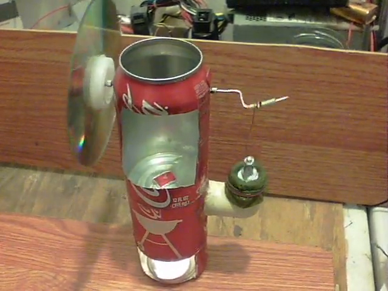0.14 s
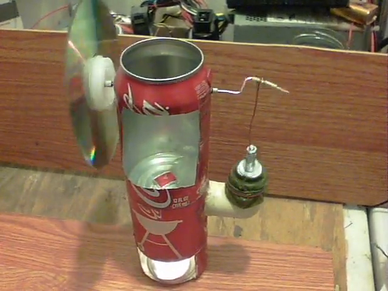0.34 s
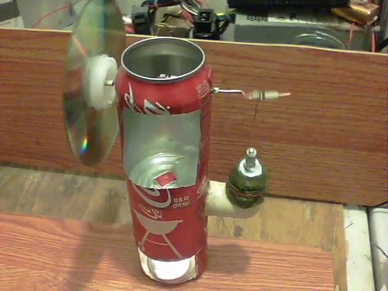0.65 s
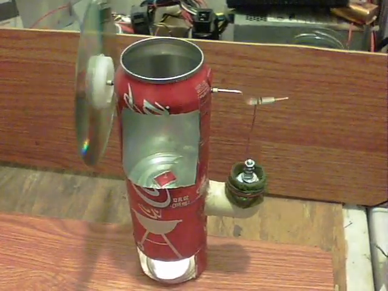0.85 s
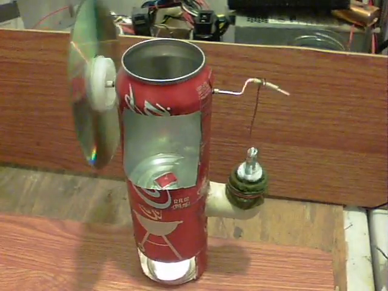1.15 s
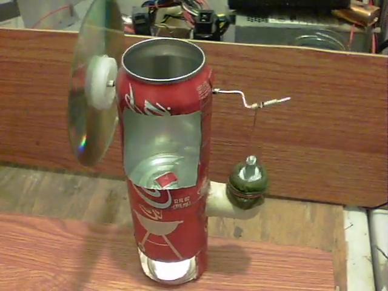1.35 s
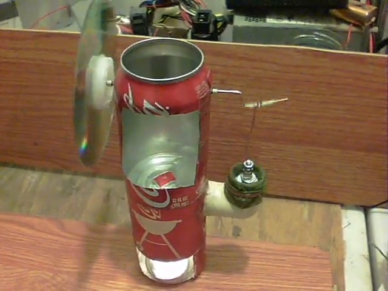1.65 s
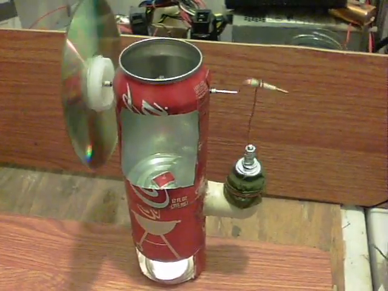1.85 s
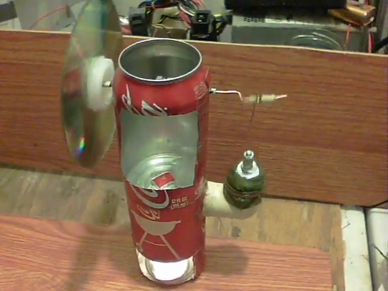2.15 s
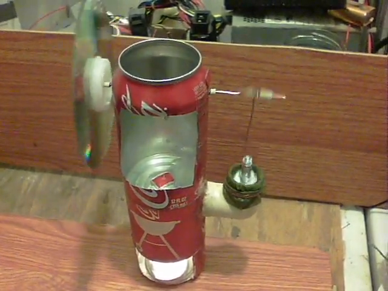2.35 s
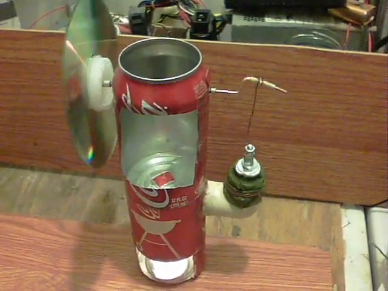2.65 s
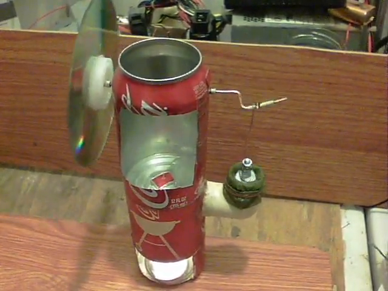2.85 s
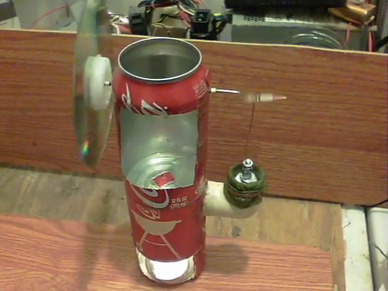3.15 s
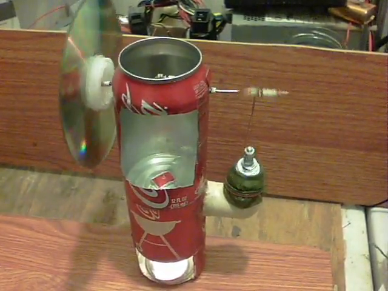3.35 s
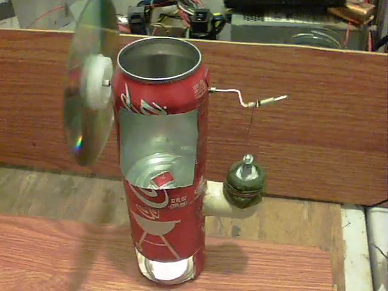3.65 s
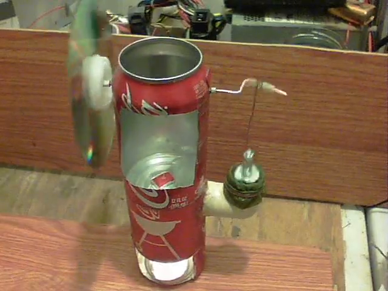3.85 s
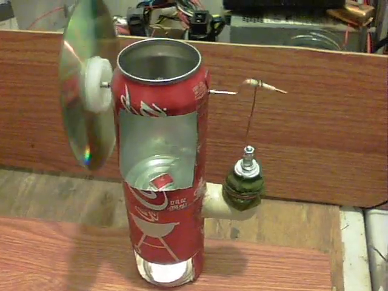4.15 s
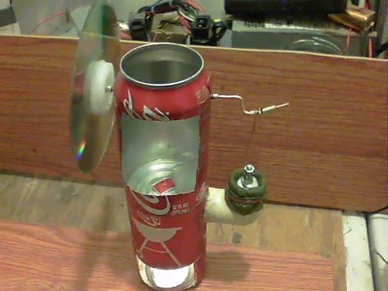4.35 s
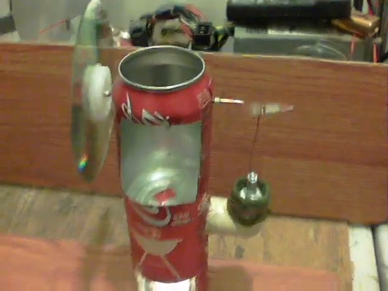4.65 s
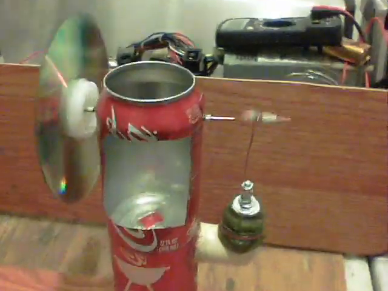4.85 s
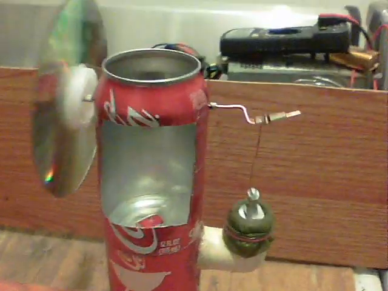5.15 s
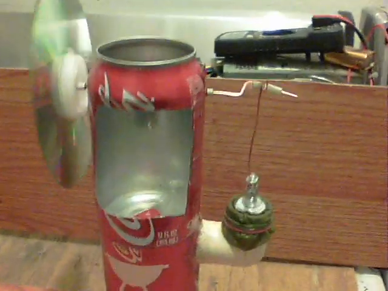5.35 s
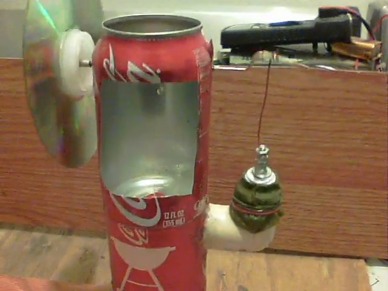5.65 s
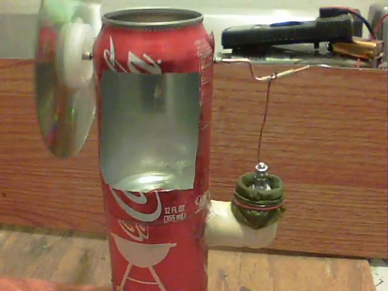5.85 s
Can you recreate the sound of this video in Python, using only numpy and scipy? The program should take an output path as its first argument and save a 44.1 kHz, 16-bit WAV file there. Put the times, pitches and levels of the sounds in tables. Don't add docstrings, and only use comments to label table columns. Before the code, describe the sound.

Close-up tinny mechanical clatter, going from start to end without stopping. Loud crank snaps alternate with tight clusters of wire knocks, small ticks and light scraping, slightly uneven from turn to turn. Everything has a short hollow can ring and a little low table thump. Short room reflections, soft hum, rumble and hiss; a cheap microphone with dulled treble.

```python
import sys
import numpy as np
from scipy import signal
from scipy.fft import rfft, irfft
from scipy.io import wavfile
from scipy.ndimage import uniform_filter1d

SR = 44100
rng = np.random.default_rng(int(sys.argv[2]) if len(sys.argv) > 2 else 0)


def invert_db(level):
    return 10 ** (np.asarray(level, dtype=float) / 20)


def master_out(mix):
    frames = np.transpose(np.atleast_2d(mix))
    ceiling = np.clip(frames, -1, 1)
    pcm = np.round(ceiling * 32767).astype(np.int16)
    wavfile.write(sys.argv[1], SR, pcm)


N = 264159
BLOW_N = 2400

# start_s [s], peak_db [dB], low_modes_db [dB], high_modes_db [dB]
CLACK_TIMES = [(0.28, -10, -8, -3.5), (0.697, -9, -2.5, -3), (1.102, -9.5, -0.5, -1),
               (1.483, -9, -1.5, -0.5), (1.853, -9.5, -3, 0.5), (2.236, -13, 0, 4), (2.627, -9, -3.5, -1),
               (3.019, -10, -4.5, 0.5), (3.405, -10.5, -1.5, 0.5), (3.782, -9, -3.5, 1),
               (4.146, -8.5, -4.5, 1), (4.516, -8, -1.5, -2), (4.892, -8, -6.5, -3.5),
               (5.275, -7.5, -2.5, 2), (5.657, -7.5, -1.5, 0.5)]
CAN_PITCHES = [615, 740, 850, 910, 1140, 1258, 1405, 1575, 1785, 1890, 2010, 2110, 2212, 2375, 2518, 2870,
               2966, 3180, 3331, 3423, 3670, 4050, 4350, 4740, 4960, 5270, 5790]
# level_db [dB], fall_by_60_db_s [s]
CAN_FADES = [(-5, 0.065), (-7.5, 0.041), (-4.5, 0.084), (-3, 0.058), (-1, 0.045), (-5.5, 0.088),
             (-3, 0.036), (-4, 0.073), (-6.5, 0.059), (-5.5, 0.069), (-8.5, 0.066), (5, 0.025),
             (3.5, 0.034), (-5, 0.05), (-3, 0.037), (-5.5, 0.084), (-7, 0.046), (-17.5, .07), (-0.5, 0.044),
             (-10, 0.068), (-2, 0.026), (-14, 0.083), (-10, 0.031), (-6.5, 0.034), (-17.5, 0.041),
             (-5.5, 0.022), (-15.5, 0.044)]
# pitch_hz [Hz], level_db [dB], fall_by_60_db_s [s]
WIRE_SNAP = [(629, -8, 0.011), (923, 3.5, 0.018), (1290, -12, 0.021), (1797, -8.5, 0.01), (2140, -6, 0.02),
             (2410, -6, 0.009), (2894, -1.5, 0.0078), (3555, -4.5, 0.01), (4120, -6.5, 0.01),
             (4980, -5, 0.0098), (5965, -19, 0.017)]
# touch_s [s], knock_s [s]
SWING_TIMES = [(0, .0153), (.4081, .4211), (.8184, .8287), (1.2365, 1.2426), (1.6045, 1.6205),
               (1.9761, 1.9885), (2.364, 2.3797), (2.7454, 2.7592), (3.1367, 3.1506), (3.5247, 3.5399),
               (3.8931, 3.9062), (4.2636, 4.2789), (4.632, 4.6434), (5.0101, 5.0238), (5.3958, 5.4089),
               (5.7823, 5.7954)]
# touch_db [dB], knock_db [dB]
SWING_LEVELS = [(-23, -14), (-16.5, -14.5), (-23.5, -14.5), (-22.5, -20), (-26, -16), (-19.5, -13),
                (-26, -12.5), (-24, -12.5), (-21, -12.5), (-20.5, -18.5), (-26.5, -15.5), (-17.5, -11.5),
                (-17.5, -17.5), (-17.5, -12.5), (-15, -11), (-16.5, -11.5)]
# first_s [s], second_s [s], third_s [s]
BEAT_TIMES = [(.0429, .0533, .0606), (.4583, .4704, .4808), (.8678, .8769, .8905), (1.2664, 1.2796, 1.2958),
              (1.6471, 1.6576, 1.6726), (2.0173, 2.0272, 2.0477), (2.408, 2.4168, 2.4335),
              (2.7874, 2.7992, 2.8176), (3.18, 3.195, 3.2095), (3.5674, 3.5824, 3.5981),
              (3.9393, 3.9455, 3.9601), (4.3088, 4.3188, 4.3296), (4.679, 4.6899, 4.7042),
              (5.0585, 5.0673, 5.0793), (5.4393, 5.452, 5.4655), (5.8303, 5.8532, 5.8647)]
# first_db [dB], second_db [dB], third_db [dB], low_modes_db [dB], high_modes_db [dB]
BEAT_LEVELS = [(-14, -14, -14, -13, -4), (-18.5, -15, -15.5, -2.5, -0.5), (-26, -12, -13.5, -16.5, -1),
               (-15, -6, -9, -6, 2), (-16.5, -9, -18, -4, 3), (-12.5, -8, -11.5, -15, -1),
               (-10, -13, -12, -13.5, .5), (-15.5, -11, -14, -14.5, -11), (-14, -9.5, -13.5, -12.5, 2),
               (-13, -16.5, -11.5, -11, 3), (-12.5, -13.5, -13.5, -6.5, 0), (-13, -13, -10, -15, -6),
               (-14.5, -15.5, -19, -12, .5), (-12, -19.5, -10.5, 0, 1), (-16, -7.5, -9.5, -11.5, 1.5),
               (-7, -9.5, -19.5, -10, -1)]


def evened(x):
    return x / np.sqrt(np.mean(x ** 2) + 1e-20)


def ring(modes, low_db, high_db, spread_db, rise):
    hz, db, t60 = np.transpose(modes)[:, :, None]
    t = np.arange(BLOW_N) / SR
    luck = rng.standard_normal((len(modes), 3))
    tilt_db = np.interp(hz, [1300, 1700, 2600, 3100], [low_db, 0, 0, high_db])
    level_db = db + tilt_db + spread_db * luck[:, :1] - 60 * t / t60
    gain = np.exp(np.float32(level_db * np.log(10) / 20))
    pitch_hz = hz + 0.57 / t60 * luck[:, 1:2]
    waves = gain * np.sin(np.float32(2 * np.pi * pitch_hz * t + 2 * luck[:, 2:]))
    fade_out = np.minimum(4 * (1 - t / t[-1]), 1)
    return waves.sum(0) * (1 - np.exp(-t / rise)) * fade_out


def ring_can(low_db, high_db, spread_db, rise):
    return ring(np.c_[CAN_PITCHES, CAN_FADES], low_db, high_db, spread_db, rise)


def blows(table, snap, db, can_db, spread_db, can_rise, snap_rise, crack_db=-60):
    out = np.zeros(N + BLOW_N)
    t = np.arange(BLOW_N) / SR
    for s, peak_db, low_db, high_db in table:
        crack = np.diff(rng.standard_normal(BLOW_N + 1))
        crack *= invert_db(crack_db + high_db - 60 * t / .012) * (1 - np.exp(-t / .001))
        sound = crack + ring(snap, low_db, high_db, spread_db, snap_rise)
        sound += invert_db(can_db) * ring_can(low_db, high_db, 4.2, can_rise)
        at = round(max(s, 0) * SR)
        out[at:at + BLOW_N] += invert_db(peak_db + db) * sound / abs(sound).max()
    return out[:N]


def contacts(s, peak_db, tilt):
    luck_db = 3 * rng.standard_normal((len(s), 2))
    return np.c_[s, peak_db, np.add(tilt, luck_db)]


def clack():
    # pitch_hz [Hz], level_db [dB], fall_by_60_db_s [s]
    pin_snap = [(898, 1.5, 0.013), (1269, -4.5, 0.055), (2350, -6.5, 0.016), (3562, 4, 0.016),
                (4954, -3, 0.019), (6060, -12.5, 0.018)]
    # pitch_hz [Hz], level_db [dB], fall_by_60_db_s [s]
    rod_thud = [(700, 2.5, 0.015), (879, -3, 0.11)]
    # pitch_hz [Hz], level_db [dB], fall_by_60_db_s [s]
    wall_rebound = [(1292, -2.5, 0.016), (1918, -4.5, 0.015), (2130, -1, 0.0047), (2302, 6, 0.013),
                    (2838, 0.5, 0.01)]

    def shifted(s):
        return np.add(CLACK_TIMES, [s, 0, 0, 0])

    out = blows(CLACK_TIMES, pin_snap, db=-3.5, can_db=-11.5, spread_db=4.0,
                can_rise=0.0013, snap_rise=0.00027, crack_db=-12.5)
    out += blows(shifted(-.0052), rod_thud, db=-18.5, can_db=-19.5, spread_db=-2.5,
                 can_rise=0.0039, snap_rise=0.001)
    out += blows(shifted(.0045), wall_rebound, db=-9.5, can_db=-8.0, spread_db=2.0,
                 can_rise=0.0011, snap_rise=0.0016)
    out += blows(shifted(0.011), wall_rebound, db=-10.5, can_db=-7.0, spread_db=4.0,
                 can_rise=0.001, snap_rise=0.00054)
    return out


def rattle_blows():
    knock_tilt, bounce_tilt = (-1.9, -4.5), (3.3, -1.9)
    graze_s, graze_db = .003, -6
    settle_s, settle_db = 0.022, -1.5
    lull_db = -0.5
    knock, knock_db = np.transpose(SWING_TIMES)[1], np.transpose(SWING_LEVELS)[1]
    first, second, third = np.transpose(BEAT_TIMES)
    beat_db, tilt = np.array(BEAT_LEVELS)[:, :3].T, np.array(BEAT_LEVELS)[:, 3:]

    rows = [contacts(knock, knock_db, knock_tilt)]
    for s, db in zip([first, second, third], beat_db):
        rows.append(contacts(s, db, tilt))
    rows.append(contacts(knock - graze_s, knock_db + graze_db, knock_tilt))
    rows.append(contacts(first - graze_s, beat_db[0] + graze_db, tilt))

    end = third + settle_s
    middle = (third + end) / 2
    gaps = [(knock, first, lull_db), (first, second, 0), (second, third, 0),
            (third, middle, settle_db / 2), (middle, end, settle_db)]
    for a, b, fade_db in gaps:
        place = rng.uniform(.3, .8, len(a))
        bounce_db = -11.5 + 2 * rng.standard_normal(len(a))
        rows.append(contacts(a + (b - a) * place, beat_db.mean(0) + bounce_db + fade_db, bounce_tilt))
    return np.vstack(rows)


def rattle():
    return blows(rattle_blows(), WIRE_SNAP, db=0.5, can_db=-11.0, spread_db=3.5,
                 can_rise=0.00074, snap_rise=0.00063, crack_db=-19.0)


def table_thump(rattling):
    return signal.lfilter(*signal.butter(2, [210, 450], "band", fs=SR), abs(rattling))


def tick_blows():
    # start_s [s], peak_db [dB], high_modes_db [dB], drag_db [dB]
    reversals = [(0.2005, -19.5, -1.5, -40), (.611, -22.5, -2, -37), (1.0186, -17.5, 0, -31),
                 (1.4153, -18.5, -3.5, -28), (1.752, -21, -1.5, -41), (2.1695, -16, -4, -29),
                 (2.5579, -20, 0.5, -39), (2.9401, -13.5, 0.7, -28), (3.33, -19.5, -7, -31),
                 (3.7101, -14, -2, -28), (4.076, -19.5, -13, -23.5), (4.4487, -17.5, 0.5, -30),
                 (4.8215, -15.5, 2, -26), (5.2023, -11, 2.5, -27), (5.5869, -19, -14, -26.5),
                 (5.9779, -14.5, -3, -28)]
    # start_s [s], peak_db [dB], low_modes_db [dB], high_modes_db [dB]
    stray_catches = [
        (.6304, -26, 13, 0),
        (2.1344, -22.5, 2, -4),
        (2.524, -31, 7, -2.5),
        (4.0453, -20.5, 6.5, -1.5),
        (4.415, -24, 0, -7),
        (0.2, -25.5, 11, -5),
        (1.7985, -28, 9, -6),
        (0.5, -29, -2, 6),
    ]
    s, db, high_db, drag_db = np.transpose(reversals)
    one = np.ones(len(s))
    tick = np.c_[s, db, 8 * one, high_db]
    drag = np.c_[s - .0155, drag_db, np.outer(one, (-10, -1.5))]
    bounce = np.c_[np.minimum(s + 0.012, N / SR), db - 14.5, np.outer(one, (1.5, -15.5))]
    return np.vstack([tick, drag, bounce, stray_catches])


def ticks():
    # pitch_hz [Hz], level_db [dB], fall_by_60_db_s [s]
    rod_snap = [(896, -10, 0.012), (1182, 1.5, 0.021), (1449, -7.5, 0.06), (1618, -2.5, 0.051),
                (2440, -5.5, 0.013), (3004, 7, 0.0099), (4366, 7.5, 0.0092), (5700, 1, 0.0038)]
    return blows(tick_blows(), rod_snap, db=-1.5, can_db=-11.0, spread_db=2.5,
                 can_rise=0.0083, snap_rise=0.00026, crack_db=-3.5)


def touches():
    # pitch_hz [Hz], level_db [dB], fall_by_60_db_s [s]
    light_snap = [(1240, -9.5, .015), (2170, -5, .015), (2950, -5, 0.025), (3530, 0.5, 0.021),
                  (5000, -2, 0.0055), (5800, -9, 0.0074)]
    table = contacts(np.transpose(SWING_TIMES)[0], np.transpose(SWING_LEVELS)[0], (-1.5, .5))
    return blows(table, light_snap, db=0.5, can_db=-14.0, spread_db=2.0,
                 can_rise=.0015, snap_rise=0.00057, crack_db=-9.5)


def flicks():
    # start_s [s], peak_db [dB]
    rim_flicks = [(.0266, -16), (.4345, -17), (.8426, -19), (1.2491, -26), (1.6324, -19), (2.003, -19),
                  (2.3937, -16), (2.773, -28), (3.1616, -22), (3.5526, -38), (4.294, -28), (4.6578, -23),
                  (5.0365, -28), (5.423, -23), (5.8127, -8.5)]
    # pitch_hz [Hz], level_db [dB], fall_by_60_db_s [s]
    rim_snap = [(2900, -4.5, .005), (3600, 7.5, 0.0062), (4500, 0, 0.0088), (5460, -10, 0.0035)]
    edges = np.c_[np.ravel(BEAT_TIMES) + .0015, np.array(BEAT_LEVELS)[:, :3].ravel() - 6]
    table = [(s, db, -6., 0) for s, db in np.r_[rim_flicks, edges]]
    return blows(table, rim_snap, db=-1.5, can_db=-24.0, spread_db=3.0,
                 can_rise=.0008, snap_rise=.0001, crack_db=-13.0)


def crank_turn():
    s = np.array(CLACK_TIMES)[:, 0]
    s = np.r_[2 * s[0] - s[1], s, 2 * s[-1] - s[-2]]
    return np.interp(np.arange(N) / SR, s, np.arange(len(s))) % 1


def chatter():
    # share_of_turn [0 to 1 after the clack], level_db [dB]
    turn_levels = [(0, -42.5), (0.04, -42), (0.119, -47.5), (.26, -48.5), (0.326, -37), (.37, -32.5),
                   (.43, -33), (.5, -26), (.56, -43), (0.639, -48), (0.719, -51.5), (0.781, -43),
                   (.86, -50), (0.952, -66), (0.999, -49)]
    hits = rng.random(N) < 700 / SR
    size = invert_db(4.1 * np.minimum(rng.exponential(1, N), 4)) * hits
    size = evened(size) * invert_db(np.interp(crank_turn(), *np.transpose(turn_levels)))
    spot = rng.integers(0, 8, N)
    out = np.zeros(N)
    for k in range(8):
        shape = ring_can(-1.3, -1.5, 4.7, 0.00024)
        shape = shape + invert_db(7.5) * ring(WIRE_SNAP, -9.5, 2.4, 8.5, 0.00013)
        out += signal.oaconvolve(size * (spot == k), shape / np.linalg.norm(shape))[:N]
    return out


def slide():
    # share_of_turn [0 to 1 after the clack], level_db [dB]
    slide_levels = [(0, -59.5), (.2, -45.5), (0.498, -56.5), (.7, -53), (.92, -66), (0.997, -57.5)]
    band = signal.butter(5, [3300, 5250], "band", fs=SR, output="sos")
    hiss = evened(signal.sosfilt(band, rng.standard_normal(N)))
    grip = evened(uniform_filter1d(rng.standard_normal(N), 250))
    return hiss * invert_db(np.interp(crank_turn(), *np.transpose(slide_levels)) + 3.1 * grip)


def table_and_room(x):
    taps = np.zeros(9000)
    at = np.arange(100, 8980, 20) + rng.integers(0, 20, 444)
    taps[at] = rng.choice([-1., 1.], 444) * invert_db(-60 * at / SR / 0.13)
    return signal.oaconvolve(x, taps / np.linalg.norm(taps))[:N]


def coloured(points):
    hz, db = np.transpose(points)
    bins = np.fft.rfftfreq(N, 1 / SR)
    gain = invert_db(np.interp(np.log(bins + 1), np.log(hz + 1), db))
    return evened(irfft(rfft(rng.standard_normal(N)) * gain, N))


def steady_tones(table):
    t = np.arange(N) / SR
    return sum(invert_db(db) * np.sqrt(2) * np.sin(2 * np.pi * hz * t) for hz, db in table)


def background():
    # pitch_hz [Hz], level_db [dB per Hz]
    room_colour = [(8.8, -25), (15, 14), (44, 5), (97, 2.5), (542, -5), (860, -17.5), (1000, -11.5),
                   (2340, -14.5), (2650, -14), (3520, -15.5), (4910, -16), (6180, -38.5), (6850, -64),
                   (8900, -83), (15100, -120)]
    # pitch_hz [Hz], level_db [dB]
    hum_tones = [
        (120, -54.5),
        (246, -60),
    ]
    lumps = coloured([(8, -26.5), (18, 5), (45, -1.5), (65, -9.5), (90, -33.5), (200, -55.5), (20000, -120)])
    sway = evened(uniform_filter1d(rng.standard_normal(N), 4900))
    rumble = lumps * invert_db(-40.5 + 2.5 * sway)
    drift = evened(uniform_filter1d(rng.standard_normal(N), 3000))
    room = invert_db(-42.0 + 1.8 * drift) * coloured(room_colour)
    return room + rumble + steady_tones(hum_tones)


def air():
    band = signal.butter(3, (5530, 6440), "band", fs=SR, output="sos")
    return invert_db(-70) * evened(signal.sosfilt(band, rng.standard_normal(N)))


def scene():
    rattling = rattle()
    engine = clack() + rattling + invert_db(-3.5) * table_thump(rattling)
    engine = engine + ticks() + touches() + flicks() + chatter() + slide()
    heard = engine + invert_db(-12.0) * table_and_room(engine)
    mic_edge = signal.butter(8, 6300, fs=SR, output="sos")
    return (signal.sosfilt(mic_edge, heard) + background() + air())[None]


def top_cut(x):
    return signal.sosfilt(signal.butter(12, 12500, fs=SR, output="sos"), x)


def record(dry):
    # pitch_hz [Hz], level_db [dB]
    whine_tones = [(8269, -105), (9647, -107), (11025, -91.5), (12403, -106)]
    overloaded = 0.63 * np.tanh(dry / 0.62)
    low_pass = signal.firwin(241, 6950, window=("kaiser", 7.5), fs=SR)
    limited = signal.oaconvolve(overloaded, low_pass[None], "same")
    noise = invert_db(-91) * rng.standard_normal(N)
    mix = limited + steady_tones(whine_tones) + noise - .0008
    return top_cut(mix)


dry = scene()
out = record(dry)
master_out(out)
```